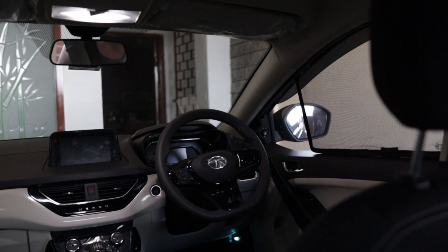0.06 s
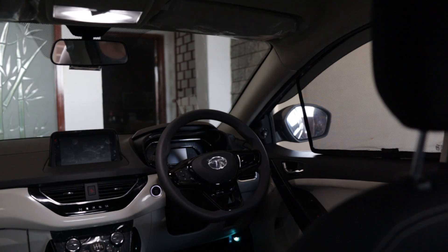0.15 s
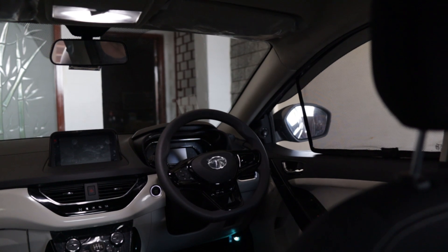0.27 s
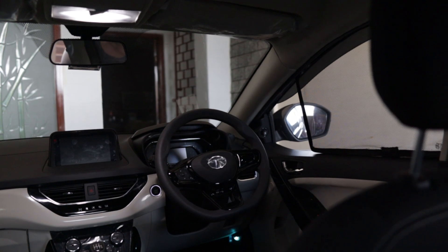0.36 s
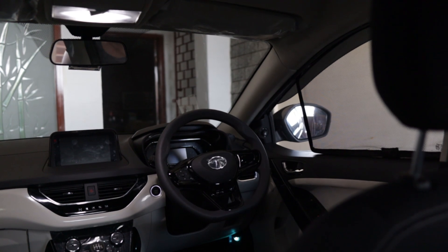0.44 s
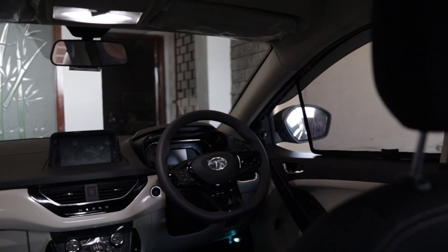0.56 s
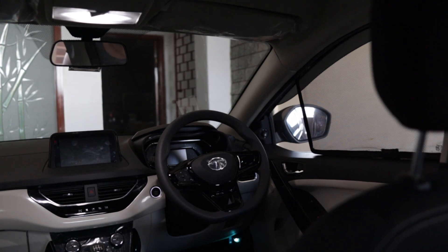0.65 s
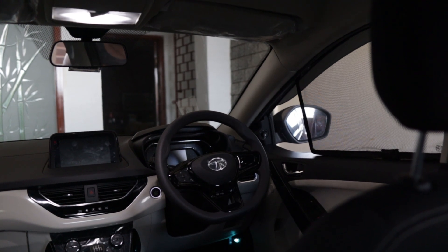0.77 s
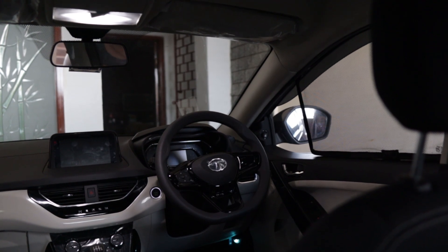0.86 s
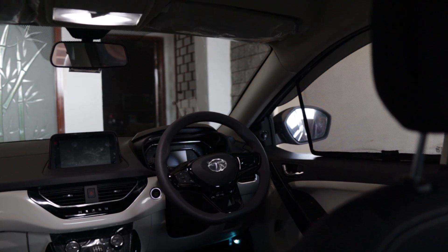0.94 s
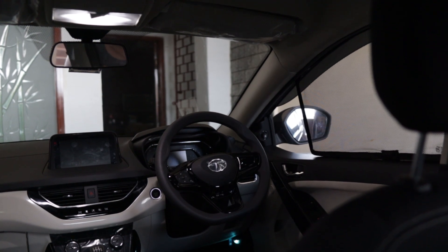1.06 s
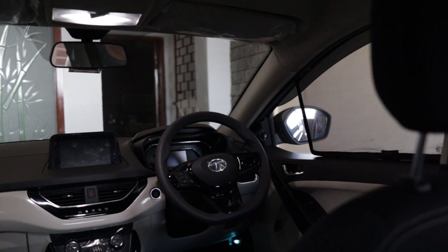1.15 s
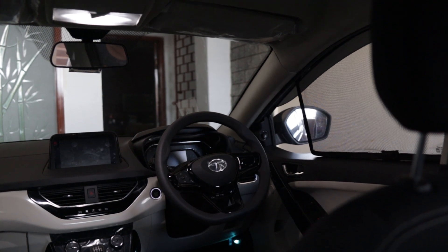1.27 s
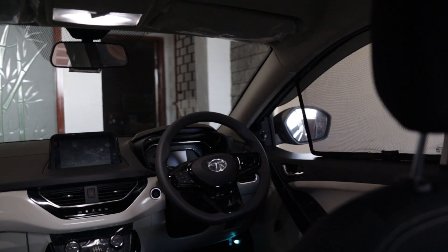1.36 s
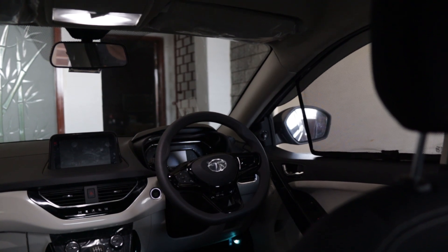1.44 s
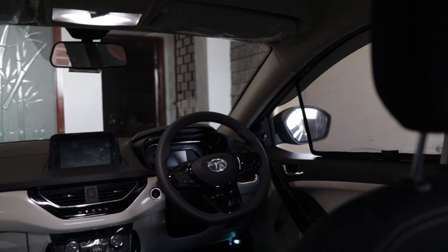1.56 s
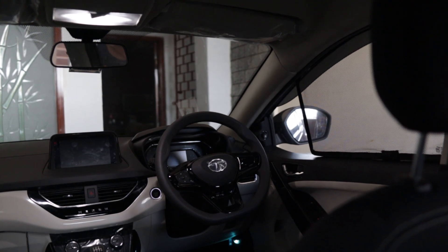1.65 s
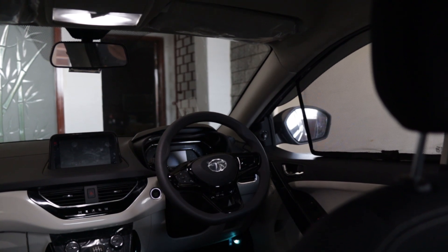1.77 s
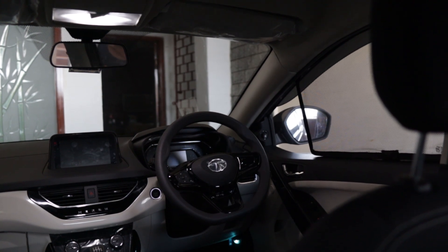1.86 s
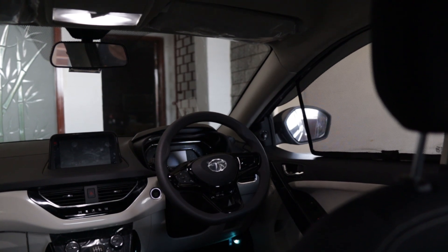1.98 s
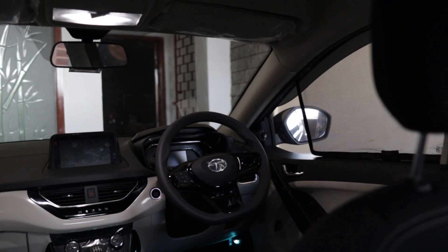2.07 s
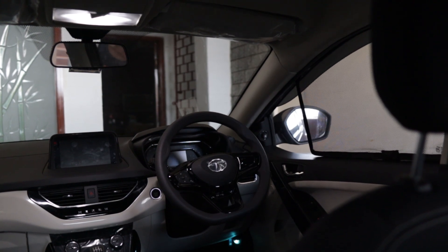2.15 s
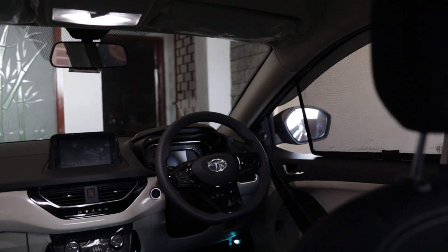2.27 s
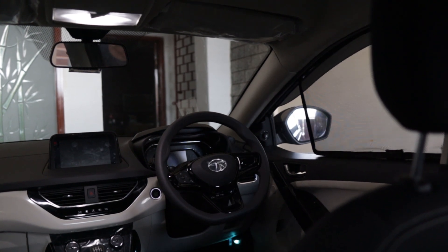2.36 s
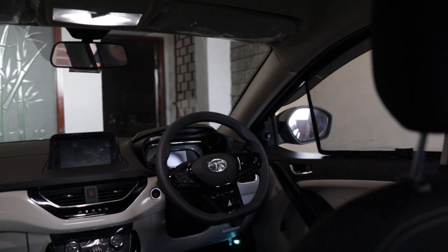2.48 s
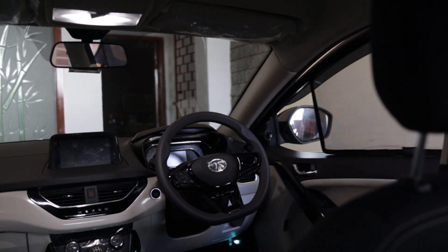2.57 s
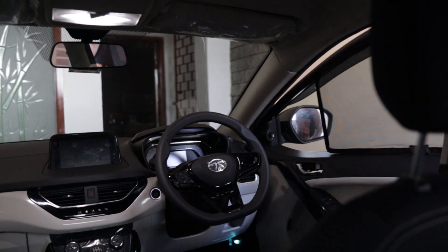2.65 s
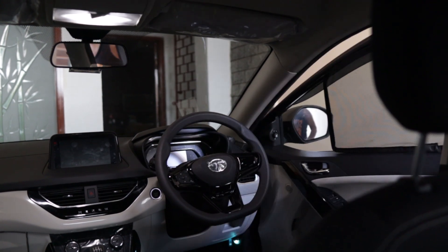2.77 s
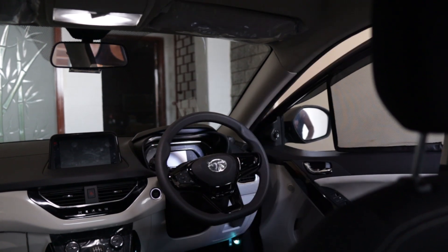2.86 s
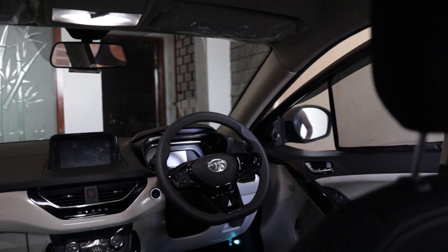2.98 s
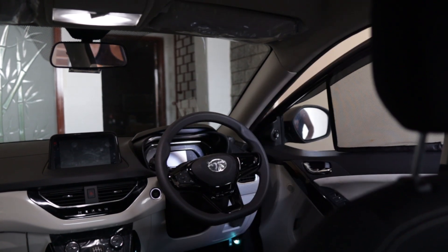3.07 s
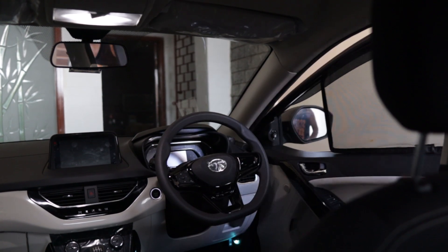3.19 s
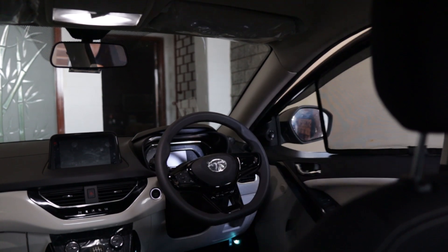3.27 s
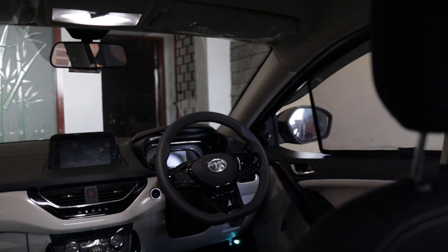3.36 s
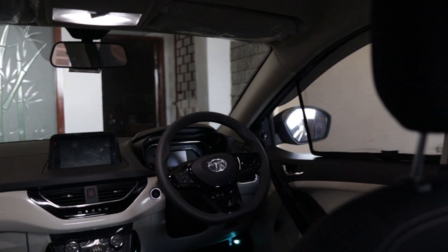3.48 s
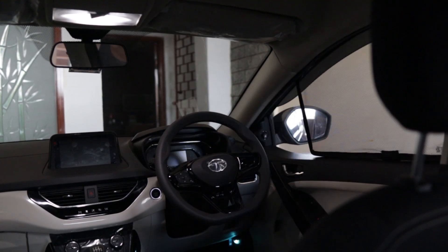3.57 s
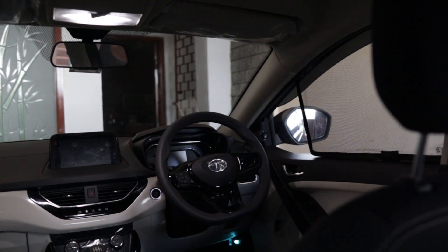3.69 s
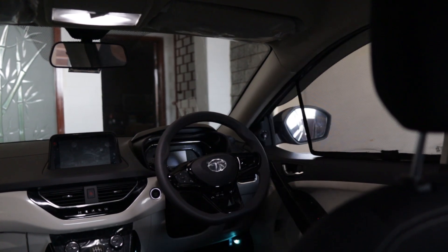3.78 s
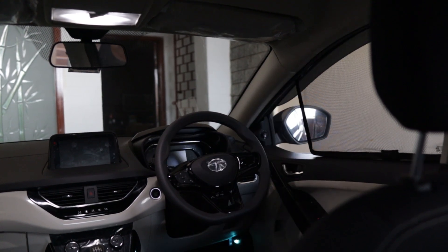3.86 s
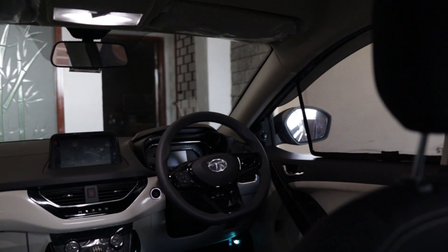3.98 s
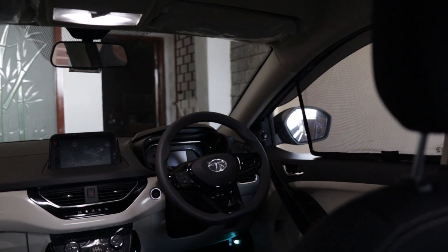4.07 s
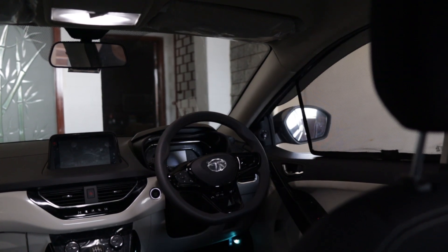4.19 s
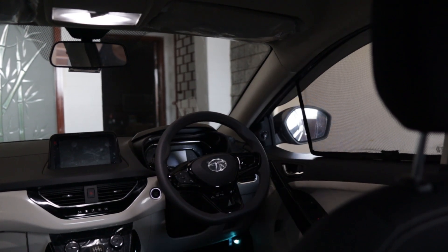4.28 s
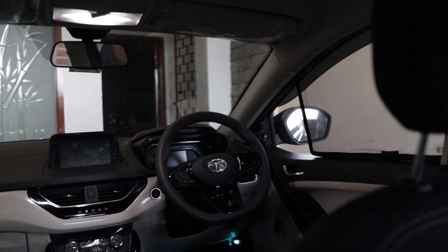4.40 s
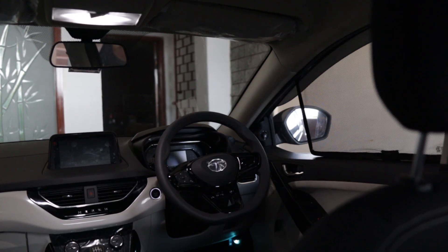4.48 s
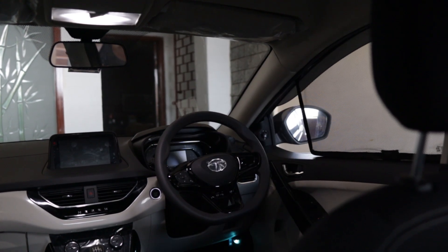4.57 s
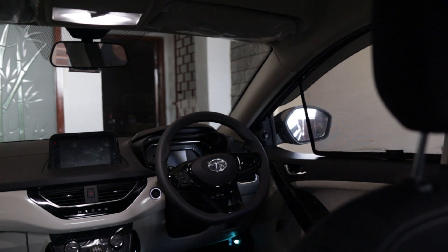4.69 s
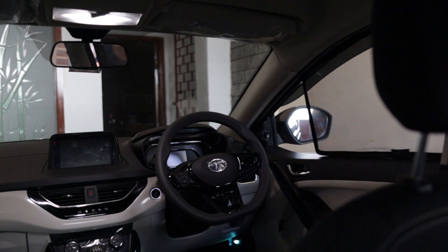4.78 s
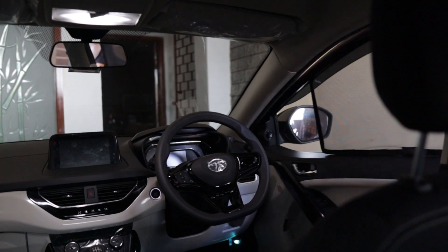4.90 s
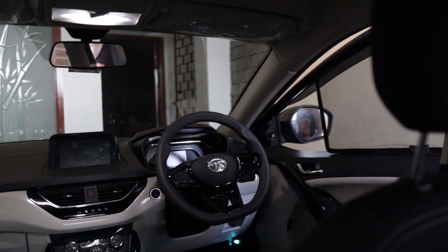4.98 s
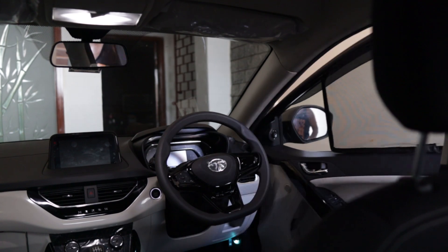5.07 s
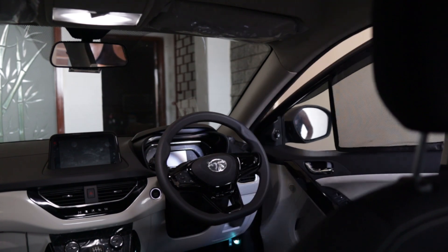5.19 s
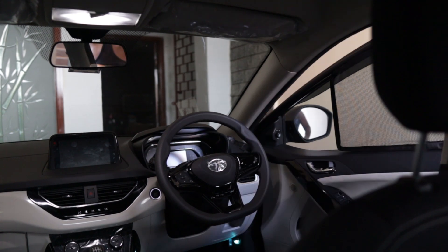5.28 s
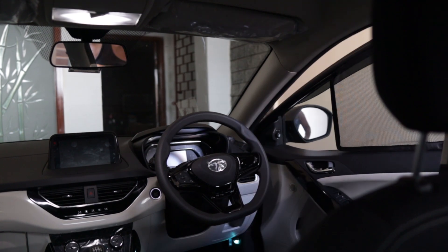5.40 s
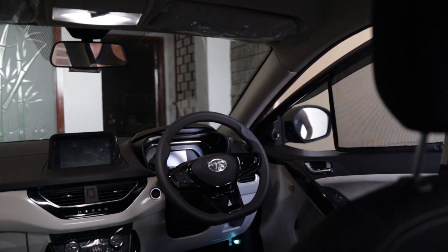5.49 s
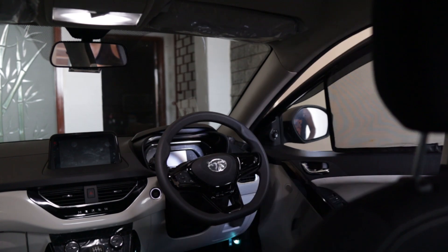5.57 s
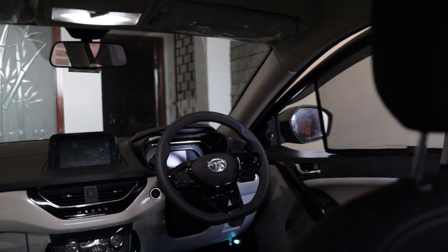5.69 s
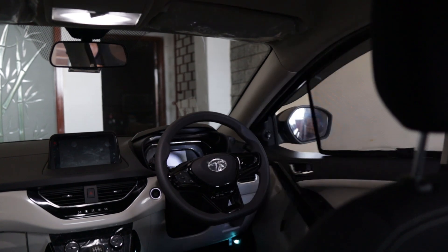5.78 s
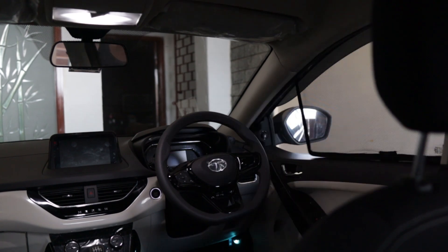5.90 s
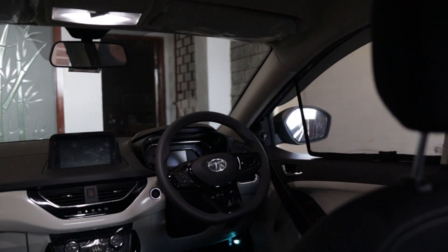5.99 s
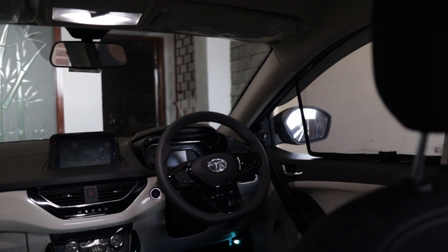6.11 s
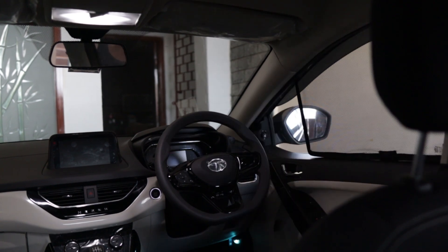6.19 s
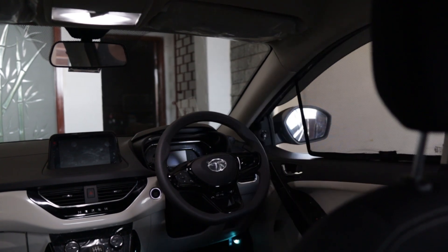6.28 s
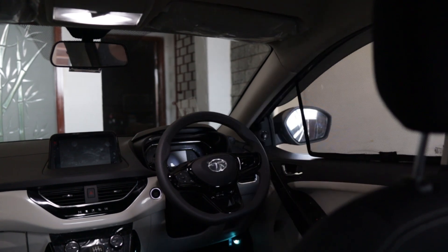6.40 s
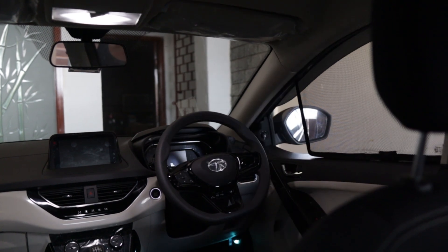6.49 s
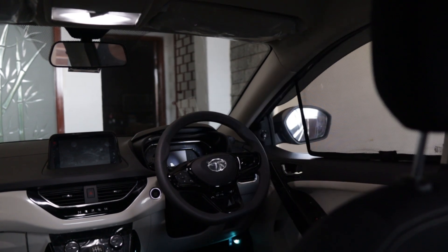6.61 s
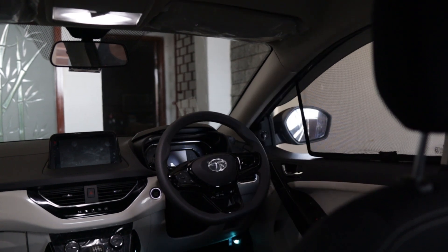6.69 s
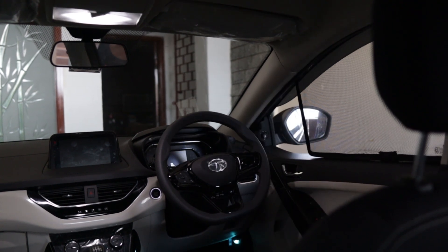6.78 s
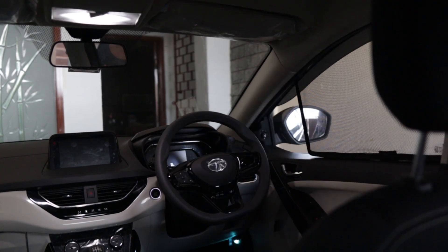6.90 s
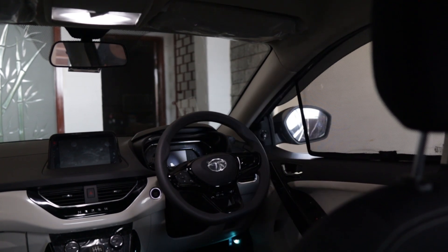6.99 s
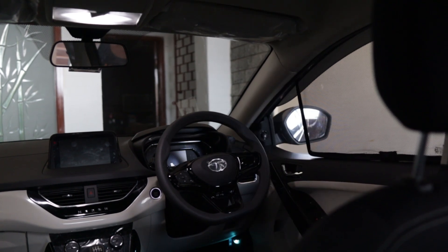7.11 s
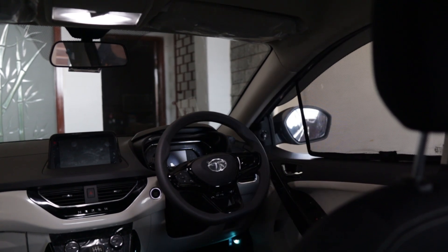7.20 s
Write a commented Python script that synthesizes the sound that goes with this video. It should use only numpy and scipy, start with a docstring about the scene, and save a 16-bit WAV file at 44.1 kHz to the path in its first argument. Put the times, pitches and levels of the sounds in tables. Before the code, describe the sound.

From inside a parked car, a slam's boom dies away, then the door is twice unlatched, swung open and slammed hard with rattles.

```python
"""A car door heard from inside the parked cabin, over a quiet outdoor hum and an even hiss.
First the boom of one slam dies away; then the door is twice unlatched, swung open and slammed.
Two clicks unlatch it. At each slam the seal is squeezed by a scattered knock, the latch crashes and
rings, damped modes boom in the cabin air, and the peaks overload the microphone and clip.
Bounces, ticks and trim rattles follow: filtered noise contacts, damped modes and low pushes of air."""
import sys
import numpy as np
from scipy import signal
from scipy.fft import rfft, irfft
from scipy.io import wavfile
from scipy.ndimage import uniform_filter1d

SR = 44100
rng = np.random.default_rng(int(sys.argv[2]) if len(sys.argv) > 2 else 0)


def int16_out(signal):
    """Quantize to a 16-bit WAV file."""
    q = np.round(np.clip(np.atleast_2d(signal).T, -1, 1) * 32767)
    wavfile.write(sys.argv[1], SR, q.astype(np.int16))


N = 319725
T = np.arange(32768) / SR  # time within one contact or push [s]

# door hits the frame: (time [s], boom level [dB], boom brightness [dB per octave],
# latch crash level [dB], latch ring level [dB])
SLAMS = [(-0.085, -1.5, 0, 1, -16), (3.621, -8.5, 1.5, -2, 5), (6.015, -3, -.5, 1.5, 5)]
# the door starts its swing back and stirs the air: (time [s], peak rumble level [dB])
SWINGS = [(3.19, -35), (5.58, -36)]
# modes of the door shell: (nominal frequency [Hz], relative level [dB], t60 [s])
SHELL = [(587, 12.5, 0.076), (635, 5, 0.14), (756, 12, 0.069), (870, -6, 0.14), (940, -5, 0.1)]


def amp(db):
    """Level and amplitude: 20 dB make a factor of ten in gain."""
    return 10 ** (np.asarray(db) / 20)


def read(points, hz):
    """Logarithmic pitch scale: joins the points by straight lines over log frequency."""
    f, value = np.transpose(points)
    return np.interp(np.log(hz + 1), np.log(f), value)


def add(mix, s, sound):
    """Superposition: sound pressures add, here from time s [s]; what falls outside the mix is cut."""
    at = round(s * SR)
    sound, part = sound[max(-at, 0):], mix[max(at, 0):]
    part[:len(sound)] += sound[:len(part)]


def unit_hit(x):
    """Equal energy: scales a hit to the energy of 15 ms at full level."""
    return x / np.sqrt(np.sum(x ** 2) / (.015 * SR))


def resonate(x, hz, width):
    """Resonance: one complex pole, its bandwidth set by the damping, with gain 1 at its centre."""
    r = np.exp(-np.pi * width / SR)
    pole = r * np.exp(2j * np.pi * hz / SR)
    return 2 * signal.lfilter([1 - r], [1, -pole], x).real


def ring(modes, rise):
    """Modal decay: damped modes set going together by one blow of finite rise time."""
    t = np.arange(2 * SR) / SR
    decays = sum(amp(db - 60 * t / t60) * np.sin(2 * np.pi * hz * t) for hz, db, t60 in modes)
    return decays * (1 - np.exp(-t / rise))


def detuned(modes, spread=0.016):
    """Modal variation: no two blows land on quite the same spot, so each mode shifts a little."""
    return [(hz * (1 + spread * rng.standard_normal()), db, t60) for hz, db, t60 in modes]


def contact(path, tone, resonances, tilt=0, rise=.003, length=1, tail_db=-32, tail_t60=0.75, own=0.33):
    """Scattering: cabin reflections build up, then die band by band over a faint tail from the yard."""
    # die-away in the padded cabin, for length 1: (frequency [Hz], t60 [s])
    cabin = [(100, 0.46), (400, 0.12), (1000, 0.082), (3000, 0.079), (12000, 0.049)]
    hz = np.fft.rfftfreq(len(T), 1 / SR)
    centres = np.geomspace(80, 16000, 12)
    # blows on the same part share much of their path to the microphone
    noise = rfft(path + own * rng.standard_normal(len(T)))
    swell = 1 - np.exp(-(T / rise) ** 1.5)
    out = 0
    for centre, pick in zip(centres, np.eye(len(centres))):
        band_power = np.interp(np.log(hz + 1), np.log(centres), pick)
        band = irfft(noise * np.sqrt(band_power))
        fade = amp(-60 * T / (length * read(cabin, centre))) + amp(tail_db - 60 * T / tail_t60)
        # the square root turns a level per Hz into the level of a band as wide as its pitch
        level = amp(read(tone, centre) + tilt * np.log2(centre)) * np.sqrt(centre)
        out = out + level * unit_hit(band * fade * swell)
    coloured = out + sum(amp(db) * resonate(out, f, width) for f, width, db in resonances)
    return unit_hit(coloured)


def push(db, hz, crest):
    """Air displacement: a shove on the cabin air swells to its crest [s] and fades in low cycles."""
    swell = (T / crest) ** 2 * np.exp(2 * (1 - T / crest))
    return -amp(db) * np.sqrt(2) * swell * np.sin(2 * np.pi * hz * T)


def knock(path, db, tilt, rise, length):
    """Soft impact: a dull contact excites the resonances of the door panel."""
    # contact spectrum: (frequency [Hz], relative level [dB per Hz])
    knock_tone = [(60, 12), (130, 0), (280, -2), (450, -12), (800, -20.5), (1200, -11.5), (2000, -39.5),
                  (4000, -44.5), (12000, -81)]
    # panel resonances: (frequency [Hz], width [Hz], lift [dB])
    panel_resonances = [(136, 12, -4), (252.3, 28, 1.5), (371, 42, 3), (540, 16, -19), (589, 35.5, 13.5),
                        (803, 50, 8.5)]
    return amp(db) * contact(path, knock_tone, panel_resonances, tilt, rise, length, tail_db=-23.5)


BUILD_UP = .007  # time for the cabin reflections of a small click to pile up [s]


def click(path, db, tilt):
    """Hard impact: a little metal contact in the lock spreads its energy to high frequencies."""
    # contact spectrum: (frequency [Hz], relative level [dB per Hz])
    click_tone = [(300, 3), (900, -1), (1700, 7.5), (3200, 4.5), (5200, 3), (8500, -12), (11000, -18),
                  (16000, -40)]
    # pawl resonances: (frequency [Hz], width [Hz], lift [dB])
    pawl_resonances = [(1344, 41, 2.2), (2745, 19, 3.4), (3380, 9.2, 2.2), (5160, 16, 1)]
    return amp(db) * contact(path, click_tone, pawl_resonances, tilt, rise=BUILD_UP, length=0.75, tail_db=-34.5)


def slams(latch_delay=0.00209):
    """Modal excitation: the door shoves the cabin air into a boom just before the latch is struck."""
    # modes of door skin and cabin air: (frequency [Hz], relative level [dB], t60 [s])
    boom = [(26.16, -6.5, 0.76), (32.3, -11.5, 1.32), (34.52, 0, 0.65), (47.87, -5.5, 0.97),
            (73.55, -6.5, 0.74), (74.6, -35.5, 6.3), (108.7, -20.5, 1.03), (124.4, 2, 0.23),
            (140.3, 4, 0.17), (188.6, -8, 0.32), (254, -17.5, 0.67)]
    # modes of striker and latch plate: (frequency [Hz], relative level [dB], t60 [s])
    latch = [(919, -12, 0.12), (1357, 0, 0.061), (1305, -31, 0.024), (1978, -8, 0.046), (3280, -20, 0.038),
             (5400, -17, 0.061), (6430, -19, 0.041)]
    # spectrum of the latch crash: (frequency [Hz], relative level [dB per Hz])
    crash_tone = [(80, 18), (200, 12.5), (500, 3.5), (1300, 1), (2500, -5), (4000, -13.5), (7000, -20),
                  (10000, -27), (16000, -55)]
    out, path = np.zeros(N), rng.standard_normal(len(T))
    for s, boom_db, tilt, crash_db, ring_db in SLAMS:
        # a quicker shove favours the higher modes of the door skin
        modes = [(hz, db + tilt * np.log2(hz / 70), t60) for hz, db, t60 in boom]
        crash = contact(path, crash_tone, [], rise=0.0045, length=1.0, tail_db=-41)
        add(out, s, amp(boom_db) * ring(modes, rise=0.0045))
        add(out, s + latch_delay, amp(crash_db) * crash)
        add(out, s + latch_delay, amp(ring_db) * ring(latch, rise=0.0049))
    return out


def seal_and_pawl(panel, lock):
    """Successive contact: the door brushes and squeezes the seal, then the pawl rides the striker."""
    brush_lead_s, squeeze_lead_s, pawl_lead_s = .035, .020, .012  # time ahead of the blow
    brush_db, squeeze_db, pawl_db = -21.5, -7.5, -18
    out = np.zeros(N)
    for s, *_ in SLAMS:
        add(out, s - brush_lead_s, knock(panel, brush_db, tilt=2.5, rise=0.0045, length=2.1))
        add(out, s - squeeze_lead_s, knock(panel, squeeze_db, tilt=2.0, rise=.0039, length=1.4))
        add(out, s - pawl_lead_s, click(lock, pawl_db, tilt=-5))
    return out


def settling(panel, lock):
    """Repeated impact: the shut door bounces on its latch and shakes rods, window and trim."""
    # bounces against the latch: (time [s], knock level [dB], brightness [dB per octave],
    # push level on the cabin air [dB], push frequency [Hz], time to the push crest [s])
    bounces = [(0.000, -27, 4, -16, 76.2, 0.018), (0.056, -20.5, -4.5, -19, 73, 0.02),
               (3.669, -17, 4.5, -8.5, 165, 0.0076), (3.698, -21, 2.5, -31, 140, .008),
               (3.724, -8, -2, -14, 148, 0.0083), (3.762, -31, -15, -17.5, 71, 0.041),
               (3.860, -15.5, -3.5, -13.5, 93, 0.0062), (6.043, 1.5, -1, -6, 125, 0.014),
               (6.064, -6, -4, -12, 75, .012), (6.118, -25, 2.5, -10, 131, 0.013),
               (6.137, -16, 1, -20, 140, 0.009), (6.160, -26, -5, -4, 55.7, 0.011),
               (6.240, -14.5, -6.5, -27, 129, 0.0075)]
    # lock rods and window tick: (time [s], level [dB], brightness [dB per octave])
    ticks = [(0.011, -41.5, 9), (0.052, -40.5, 1), (2.244, -46, -4.5), (3.671, -28, -2), (3.703, -28, -5),
             (3.726, -26.5, -0.5), (3.768, -40, 10), (3.793, -42.5, 3), (3.865, -44.5, 4),
             (6.045, -18, -0.5), (6.060, -37, 11), (6.139, -40, 6), (6.199, -40.5, 1), (6.276, -48.5, 7),
             (6.914, -41, -4.5)]
    # loose trim chatters: (time [s], level [dB], ring of the piece [Hz])
    rattles = [(0.049, -24.5, 2360), (0.121, -36.5, 2470), (3.672, -17.5, 2380), (3.813, -25.5, 2350),
               (6.06, -20, 1780), (6.104, -25.5, 1750), (6.144, -20.5, 1715), (6.237, -30, 1820),
               (6.257, -31.5, 1760)]
    # contact spectrum of the trim: (frequency [Hz], relative level [dB per Hz])
    rattle_tone = [(300, 12), (700, 4.5), (1000, 3.5), (2000, 5.5), (3000, -36), (5000, -21), (12000, -42)]
    # resonances that all the trim shares: (frequency [Hz], width [Hz], lift [dB])
    shared_trim = [(959, 44, 16.5), (1253, 21, -4), (2390, 98, 11)]
    clack_db = -23.5  # ring of the door shell against the knock
    piece_width_hz, piece_lift_db = 52, 14.5
    out, trim = np.zeros(N), rng.standard_normal(len(T))
    for s, db, tilt, push_db, hz, crest in bounces:
        add(out, s, knock(panel, db, tilt, rise=0.0018, length=1.0) + push(push_db, hz, crest))
        add(out, s, amp(db + clack_db) * unit_hit(ring(detuned(SHELL), rise=0.0064)))
    for s, db, tilt in ticks:
        add(out, s, click(lock, db, tilt))
    for s, db, hz in rattles:
        resonances = shared_trim + [(hz, piece_width_hz, piece_lift_db)]
        rattle = contact(trim, rattle_tone, resonances, rise=BUILD_UP, length=0.44, tail_db=-47)
        add(out, s, amp(db) * rattle)
    return out


def unlatching(panel, lock):
    """Elastic release: between two catch clicks the door springs off its seal; the second recoils."""
    # the latch lets go: (time of the first click [s], its level [dB])
    unlatchings = [(2.390, -34.5), (4.713, -31)]
    spring_s, second_click_s = .017, .037  # time after the first click
    spring_db, recoil_db = -20, -23
    second_click_db = 3  # against the first click
    click_tilt = -4.5  # dB per octave
    out = np.zeros(N)
    for s, db in unlatchings:
        add(out, s, click(lock, db, click_tilt))
        add(out, s + spring_s, knock(panel, spring_db, tilt=1.4, rise=0.0016, length=1.14))
        add(out, s + second_click_s, click(lock, db + second_click_db, click_tilt))
        add(out, s + second_click_s, knock(panel, recoil_db, tilt=-.3, rise=0.0013, length=1.25))
    return out


def handling(panel):
    """Structure and air excitation: handle thumps, check strap creaks and pushes of the moving door."""
    # the handle is pulled or let go and the hollow door thumps: (time [s], knock level [dB],
    # brightness [dB per octave], push level [dB], push frequency [Hz], shell clack level [dB])
    thumps = [(0.082, -25.5, 0, -34, 75, -32), (2.271, -21.5, -6, -22.5, 97.6, -51),
              (2.577, -20.5, -6.5, -18, 70, -36.5), (3.980, -19, -3.5, -31, 56.3, -29.5),
              (4.895, -23, -2.5, -16.5, 68, -35), (6.910, -21.5, -4, -19, 109, -30),
              (7.122, -23, -7.5, -31, 119, -39)]
    # handle and check strap rub, the inner panel hums: (time [s], knock level [dB], hum level [dB])
    creaks = [(2.241, -28, -33.5), (2.693, -43, -43.5), (2.882, -32.5, -34), (2.942, -36.5, -35),
              (3.955, -34.5, -48), (4.604, -33, -31), (5.049, -64, -42.5), (5.224, -34.5, -37),
              (5.270, -26, -33), (6.881, -31.5, -35.5)]
    # modes of the inner panel: (nominal frequency [Hz], relative level [dB], t60 [s])
    inner_panel = [(388.4, 15, 0.11), (409, -20, 0.17), (263, -15, 0.27)]
    # the moving door nudges the cabin air: (time [s], level [dB], frequency [Hz])
    nudges = [(2.094, -32, 101), (2.439, -25, 73), (2.90, -32.5, 118), (4.618, -32, 105), (5.290, -28, 122),
              (7.147, -26, 118)]
    afterswing_s, afterswing_db, afterswing_hz = 0.0192, -8.5, 143  # delay and level against the thump
    swing_lead_s, swing_tone_db = 0.0394, 4  # the cabin air hums with the swing; dB against its rumble
    out = np.zeros(N)
    for s, db, tilt, push_db, hz, clack_db in thumps:
        add(out, s, knock(panel, db, tilt, rise=0.002, length=.85) + push(push_db, hz, crest=0.0097))
        add(out, s, amp(clack_db) * unit_hit(ring(detuned(SHELL), rise=0.0079)))
        add(out, s + afterswing_s, push(push_db + afterswing_db, afterswing_hz, crest=0.017))
    for s, db, hum_db in creaks:
        add(out, s, knock(panel, db, tilt=.3, rise=0.0012, length=1.8))
        add(out, s, amp(hum_db) * unit_hit(ring(detuned(inner_panel), rise=0.0087)))
    for s, db, hz in nudges:
        add(out, s, push(db, hz, crest=0.019))
    for s, db in SWINGS:
        add(out, s - swing_lead_s, push(db + swing_tone_db, hz=56.7, crest=.045))
    return out


def rumble_level(t):
    """Power summation: surges of swings and slams over a bed that steps up once a hand works the door."""
    rest_db, handled_db, handled_from_s = -59, -45, 2.08
    rock_db = -31  # rocking of the body against the boom

    def surge(s, db, rise, fall):
        """Exponential growth and decay: rise and fall in dB per second around time s."""
        return amp(db - np.maximum((s - t) * rise, (t - s) * fall))

    parts = [amp(np.where(t < handled_from_s, rest_db, handled_db))]
    parts += [surge(s, db, rise=330, fall=91) for s, db in SWINGS]
    parts += [surge(s, boom_db + rock_db, rise=132, fall=24) for s, boom_db, *_ in SLAMS]
    return np.linalg.norm(parts, axis=0)


def shaped_noise(tone):
    """Spectral shaping: white noise filtered to a tone and scaled to unit RMS."""
    hz = np.fft.rfftfreq(N, 1 / SR)
    noise = irfft(rfft(rng.standard_normal(N)) * amp(read(tone, hz)), N)
    return noise / noise.std()


def background():
    """Stationary and modulated noise: even hiss, low outdoor hum and deep rumble of door and body."""
    # spectrum of hum and hiss: (frequency [Hz], relative level [dB per Hz])
    floor_tone = [(15, -31), (30, -11), (50, 0.5), (76, -11.5), (112, -5), (215, 4), (330, -6), (600, -9.5),
                  (750, -15.5), (1000, -14), (1200, -19), (2000, -21.5), (6000, -24.5), (15500, -26.5)]
    # spectrum of the rumble: (frequency [Hz], relative level [dB per Hz])
    rumble_tone = [(12, -29), (26, 2), (45, -5.5), (60, 2), (80, -0.5), (110, -22), (250, -32), (1000, -82)]
    # outdoor hum swelling and easing: (time [s], relative level [dB])
    hum_swell = [(0, 3), (0.65, 1.5), (1.0, -1.8), (2.7, -.3), (4.4, -1.5), (5.8, 0.5), (6.75, 2.5),
                 (7.25, 2.5)]
    floor_db = -42  # hum and hiss together, before the hum swells
    hz, t = np.fft.rfftfreq(N, 1 / SR), np.arange(N) / SR
    noise = shaped_noise(floor_tone)
    hum = irfft(rfft(noise) / (1 + (hz / 700) ** 2), N)
    hiss = noise - hum
    air = amp(floor_db) * (hiss + hum * amp(np.interp(t, *np.transpose(hum_swell))))
    return air + rumble_level(t) * shaped_noise(rumble_tone)


def scene():
    """Superposition: door and background add at one microphone."""
    # scattering paths shared by all blows on the panel and in the lock
    panel, lock = rng.standard_normal((2, len(T)))
    door = slams() + seal_and_pawl(panel, lock) + settling(panel, lock)
    door = door + unlatching(panel, lock) + handling(panel)
    return (door + background())[None]


def record(dry, threshold_db=-7, share=0.42, recovery_db_per_s=10.5):
    """Compression and overload: gain dips after the heaviest blows, peaks clip, the band is limited."""
    edge_hz = 15800
    power_db = 10 * np.log10(abs(uniform_filter1d(dry[0] ** 2, size=2000)) + 1e-12)
    # the held level jumps up with the power and recovers at a steady rate
    fall = np.arange(N) / SR * recovery_db_per_s
    held_db = np.maximum.accumulate(power_db + fall) - fall
    over_db = np.maximum(held_db - threshold_db, 0)
    # the gain follows with a lag of 3000 samples
    over_db = signal.lfilter([1 / 3000], [1, 1 / 3000 - 1], over_db)
    clipped = np.clip(dry * amp(-share * over_db), -1, 1)
    low_pass = signal.firwin(511, edge_hz, window=("kaiser", 9), fs=SR)
    return signal.oaconvolve(clipped, low_pass[None], "same")


dry = scene()
out = record(dry)
int16_out(out)
```